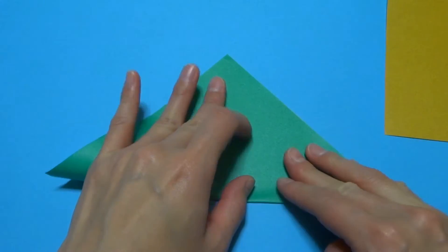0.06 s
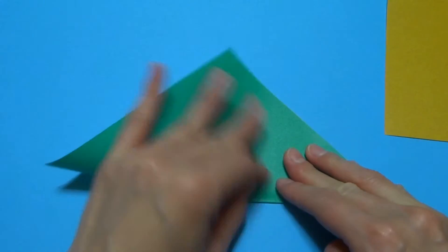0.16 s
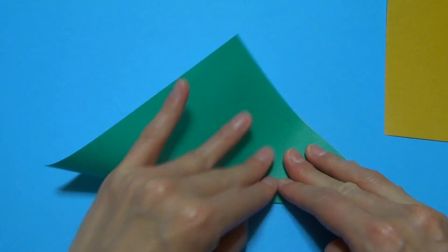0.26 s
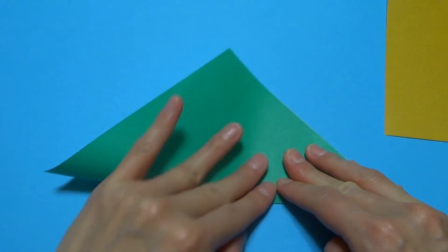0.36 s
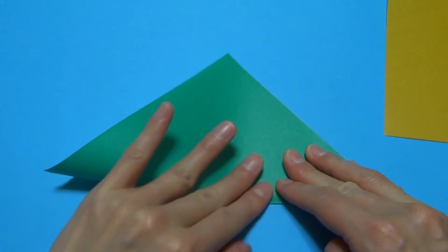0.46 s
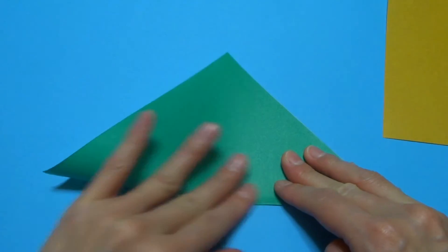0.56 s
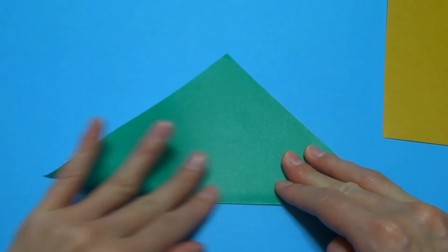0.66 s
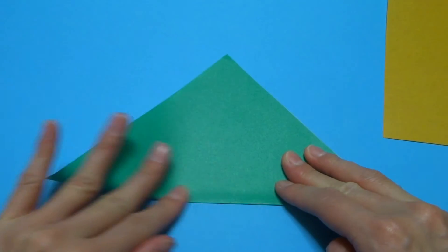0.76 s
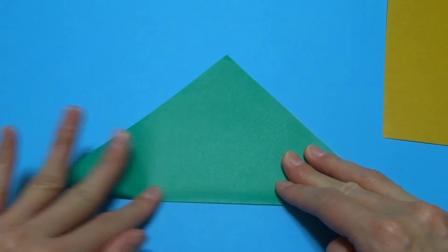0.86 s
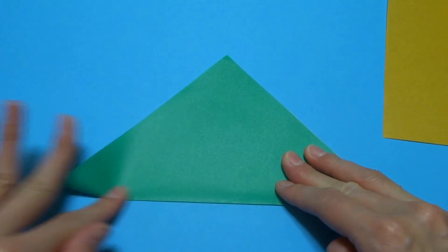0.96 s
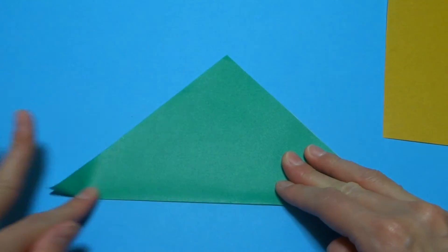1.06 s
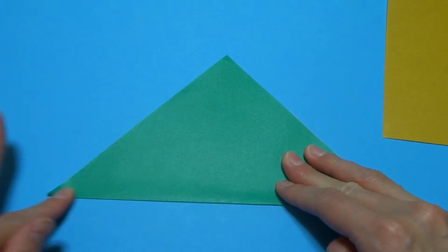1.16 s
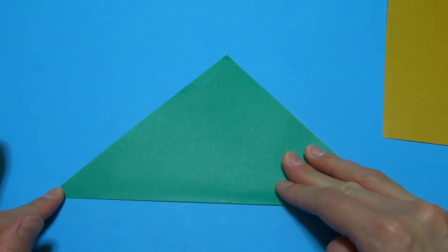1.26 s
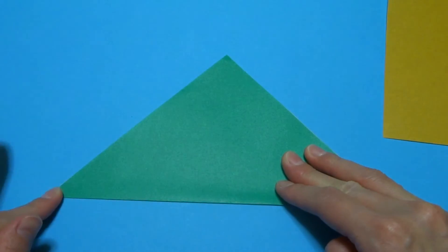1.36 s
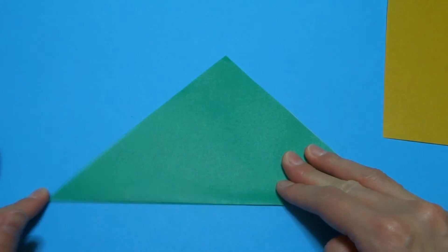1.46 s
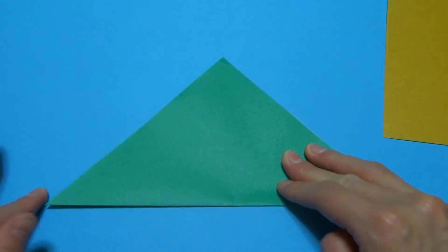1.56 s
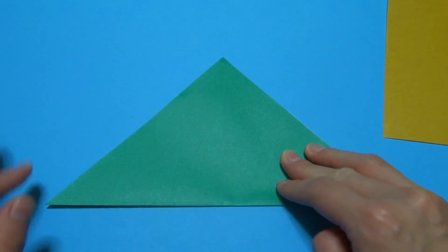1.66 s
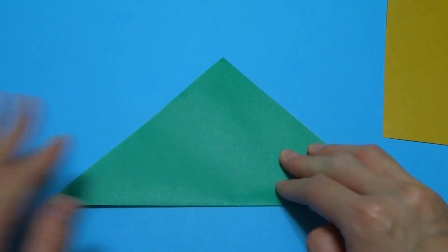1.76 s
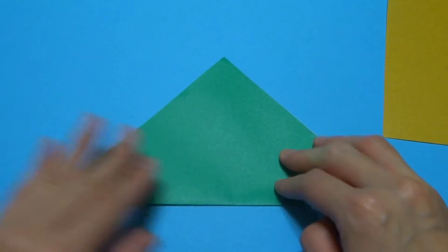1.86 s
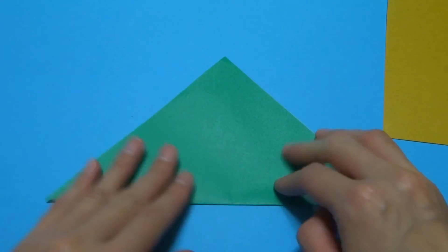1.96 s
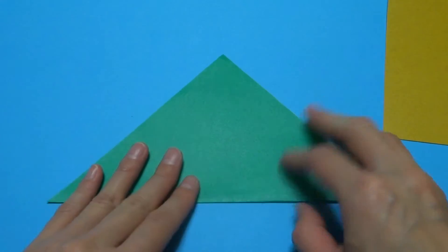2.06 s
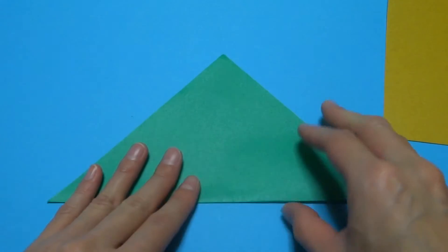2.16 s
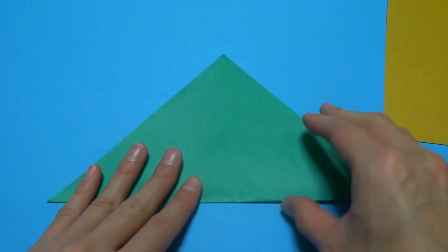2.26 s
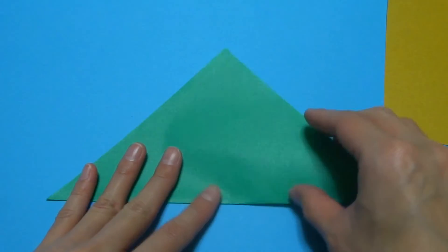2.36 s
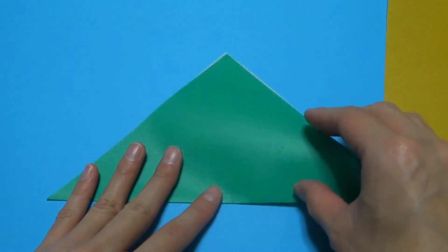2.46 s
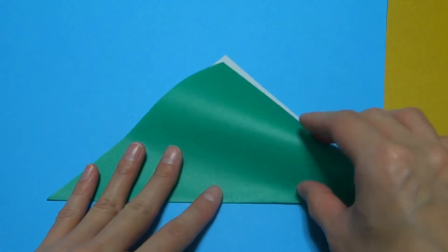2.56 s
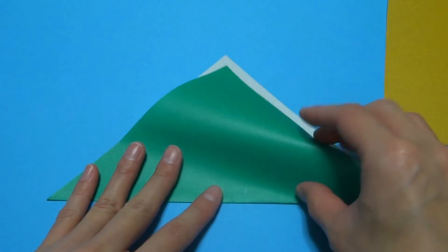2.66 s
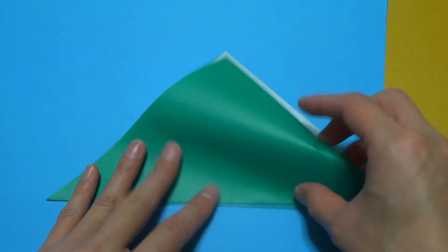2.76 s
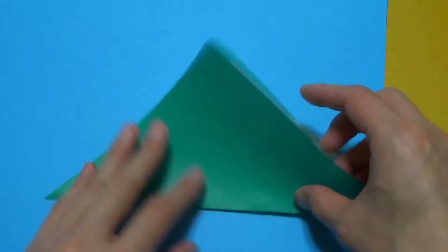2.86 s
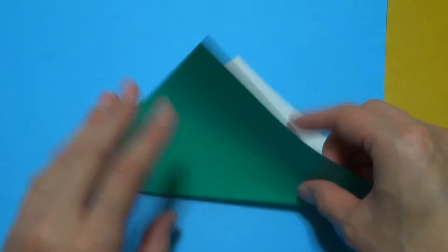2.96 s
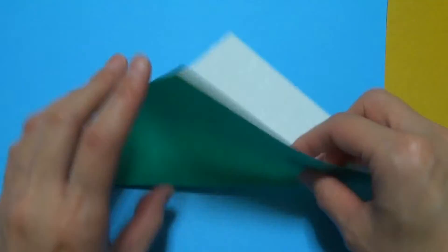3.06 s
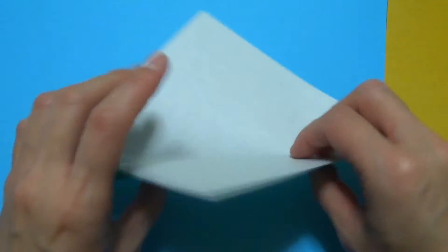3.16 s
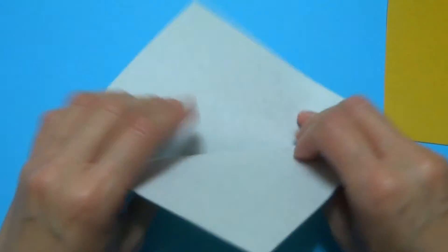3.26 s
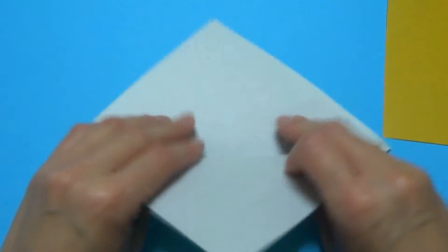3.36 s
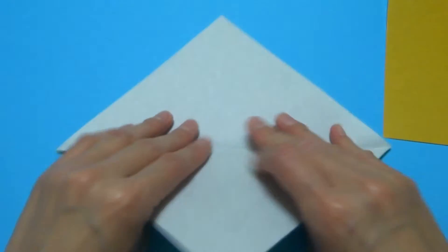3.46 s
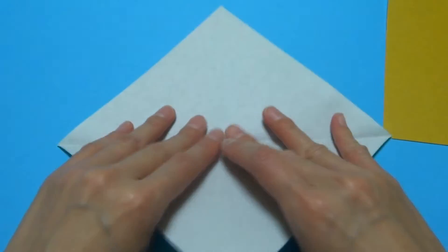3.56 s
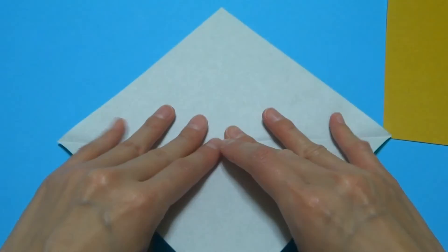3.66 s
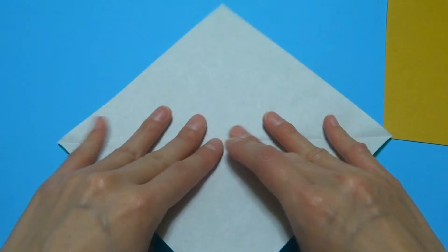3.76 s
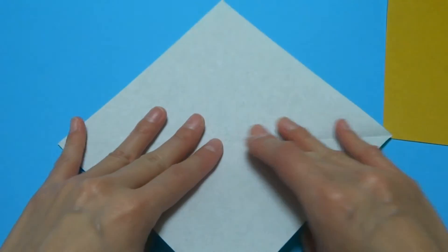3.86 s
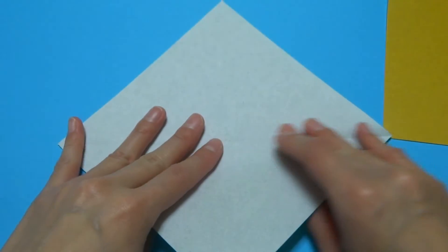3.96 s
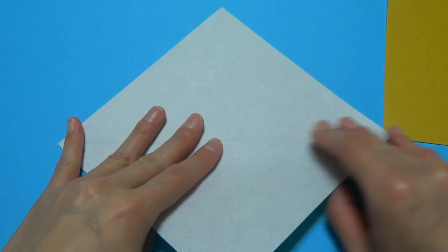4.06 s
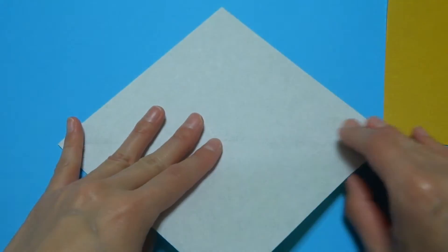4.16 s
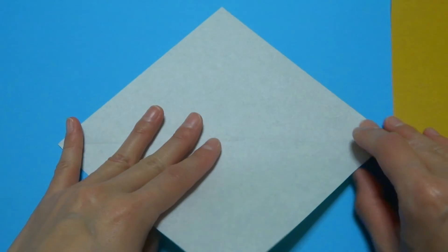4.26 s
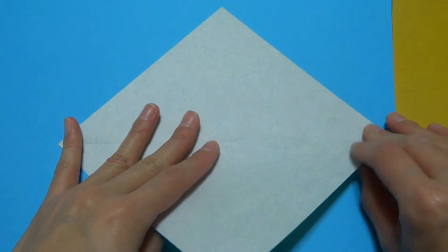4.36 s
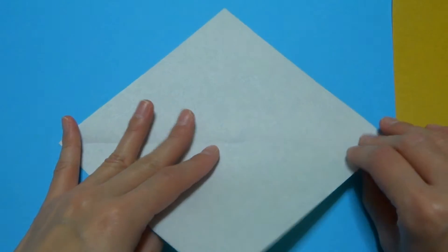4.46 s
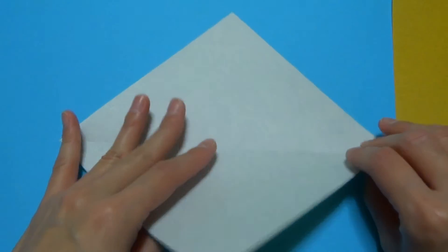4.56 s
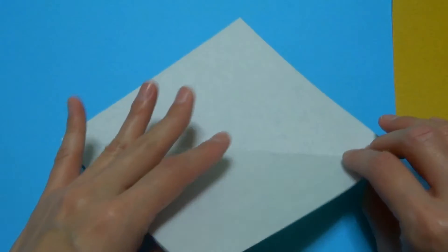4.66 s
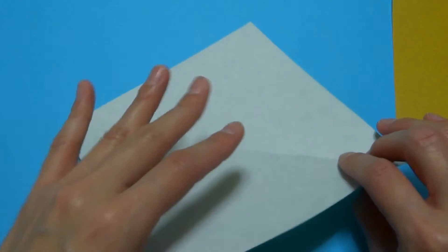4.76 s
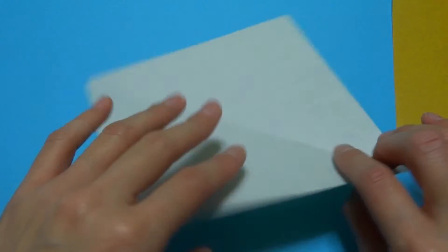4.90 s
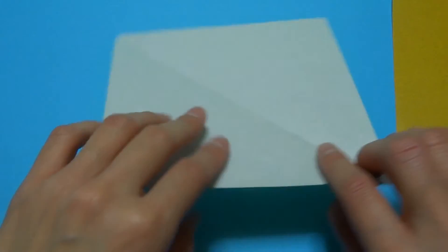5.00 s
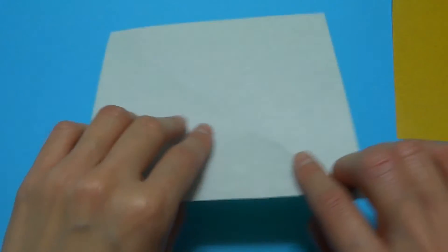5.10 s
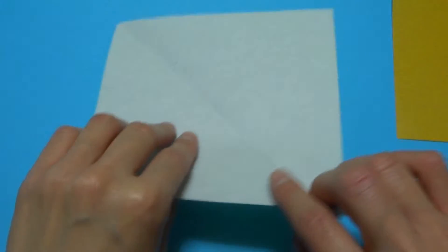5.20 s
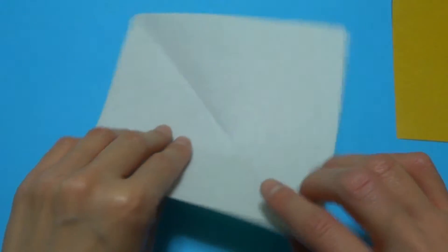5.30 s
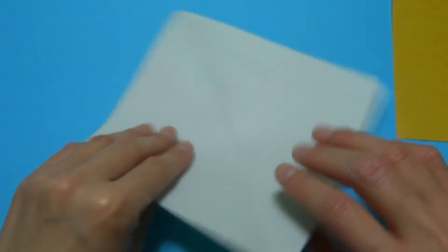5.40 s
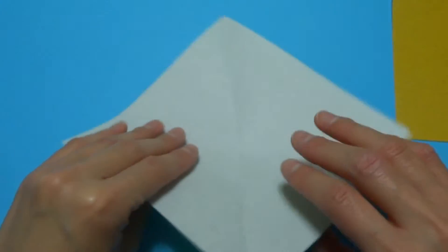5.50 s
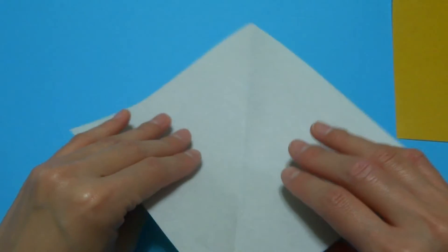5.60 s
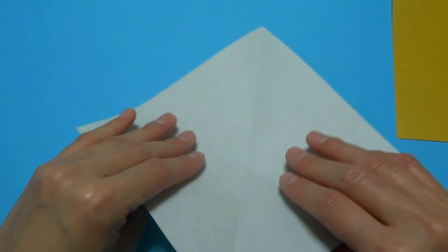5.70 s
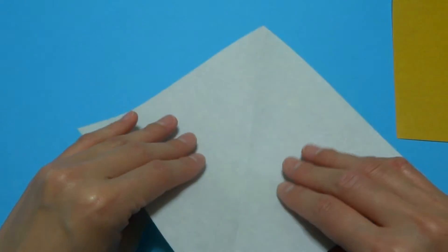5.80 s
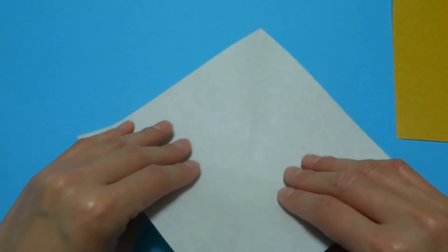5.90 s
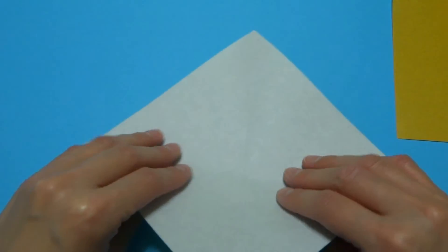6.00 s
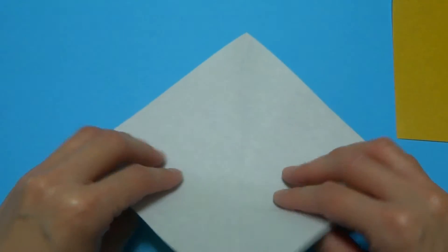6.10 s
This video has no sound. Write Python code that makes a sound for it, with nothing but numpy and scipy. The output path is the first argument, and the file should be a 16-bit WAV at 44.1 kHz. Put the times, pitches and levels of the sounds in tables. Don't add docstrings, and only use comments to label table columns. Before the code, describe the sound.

A thin sheet of paper is creased, snapped open, turned and smoothed by hand on a table, over faint fan whir and hiss.

```python
import sys
import numpy as np
from scipy import signal
from scipy.fft import rfft, irfft, next_fast_len
from scipy.io import wavfile
from scipy.ndimage import uniform_filter1d, map_coordinates

SR = 44100
rng = np.random.default_rng(int(sys.argv[2]) if len(sys.argv) > 2 else 0)


def amplitude_ratio(level_db):
    exponent = np.asarray(level_db, float) / 20
    return 10 ** exponent


def generate_wav(signal):
    frames = np.transpose(np.atleast_2d(signal))
    scaled = np.clip(frames, -1, 1) * 32767
    pcm = np.round(scaled).astype(np.int16)
    wavfile.write(sys.argv[1], SR, pcm)


N = 270774

# pitch_hz, level_db (per Hz)
HUSH_SHARED = [(15, -32), (25, 0.5), (40, -3), (60, -5), (92, -5.5), (125, -10.5), (214, -11), (298, -15),
               (365, -17), (786, -22.5), (1180, -8.5), (1310, -13.5), (1530, -9), (2020, -25), (11200, -44),
               (14600, -76), (22000, -120)]
# pitch_hz, level_db (per Hz)
HUSH_OPPOSITE = [(15, -61), (25, -31), (97, -16.5), (237, -16.5), (306, -14), (347, -21), (385, -14),
                 (484, -19), (871, -17), (1010, -2.5), (1380, -19), (1490, -8), (1740, -14), (1970, -24),
                 (11200, -51), (14600, -89), (22000, -120)]
# pitch_hz, width_hz, level_db, left_lead_rad
FAN_WHIRS = [(1194, 41, -64.5, 0.99), (1509, 55, -67.5, -0.85), (102.6, 14.3, -63, -0.088)]
# pitch_hz, time_to_fall_60_db_s
ROOM_DECAY = [(500, 0.52), (2000, 0.11), (5000, 0.17), (10000, 0.061)]
# pitch_hz, width_hz, level_db
WOOD_MODES = [(219, 90, -6.5), (417, 270, -1), (670, 240, -3.5), (920, 130, 3.5)]
# start_s, level_db, pitch_hz, time_to_fall_60_db_s, rise_s, wood_db
KNOCKS = [(.255, -48.5, 110, 0.062, 0.005, 3.5), (0.31, -38, 205, 0.06, 0.0011, -8),
          (1.375, -33.5, 112, 0.059, 0.0018, -4), (1.384, -41, 111, 0.057, 0.0018, -2),
          (1.394, -36.5, 104, 0.064, .002, -4.5), (1.403, -45.5, 105, 0.12, 0.0026, 6),
          (1.52, -46, 90, 0.12, 0.0043, -16), (2.899, -45, 133, 0.1, .005, -4),
          (3.24, -37.5, 70, 0.26, 0.039, -5.5), (3.431, -37, 59.7, 0.26, 0.018, -31),
          (3.511, -36, 69.6, .3, 0.024, -25), (3.66, -39.5, 199, 0.15, 0.0042, -8),
          (5.559, -37.5, 72, 0.36, 0.029, -30)]
ZONE_CENTRES = [1160, 3000, 5550, 9700]
# time_s, flap_db, body_db, rasp_db, sheen_db
SLIDING = [(0.0, -53, -74, -81, -70), (0.016, -66, -82, -87, -82), (0.032, -46, -57, -60, -59),
           (0.048, -72, -56, -58, -58), (0.094, -74.5, -70, -74, -71), (0.106, -57, -60, -64, -54),
           (0.142, -64, -69, -64, -65), (0.224, -54, -55, -41, -45.5), (0.356, -58.5, -54, -59, -58),
           (0.414, -53, -62, -64, -69), (0.5, -67, -67, -67, -68), (0.51, -53, -81, -64, -74.5),
           (0.522, -72, -47, -68, -62), (0.582, -48.5, -53, -43, -49), (0.7, -53.5, -48.5, -43.5, -43.5),
           (0.764, -52.5, -47.5, -54, -49), (0.902, -57, -51.5, -42, -52.5), (0.922, -72, -49, -55, -49),
           (0.932, -58, -50, -51, -49), (0.974, -64, -48, -43, -46.5), (0.988, -55, -49.5, -44.5, -49),
           (1.022, -60, -59, -48.5, -52.5), (1.116, -59, -58, -62, -53), (1.138, -69, -59, -65, -58),
           (1.3, -61, -77, -77, -80), (1.33, -70, -82, -88, -82), (1.36, -64, -76, -75, -84),
           (1.372, -56, -62, -71, -71), (1.408, -59, -70, -73, -81), (1.486, -58, -72, -64, -59.5),
           (1.564, -62, -78, -75, -73), (1.61, -56, -72, -74, -65), (1.64, -62.5, -77, -78, -78),
           (1.858, -61.5, -87, -80, -81), (1.868, -62, -90, -68, -65.5), (1.926, -60, -86, -78, -80),
           (2.046, -61, -83, -73, -58.5), (2.112, -55, -82, -75, -76), (2.298, -59, -77, -79, -75),
           (2.308, -58, -79, -76, -64), (2.53, -59, -69, -67, -69), (2.56, -50, -72, -64, -66),
           (2.642, -52.5, -55.5, -56.5, -56), (2.758, -63, -61.5, -63, -65), (2.864, -50, -59, -57, -58),
           (2.974, -39.5, -52, -41, -47), (3.052, -44, -49.5, -49.5, -59), (3.2, -53, -60.5, -50, -50),
           (3.22, -48, -49, -62, -60), (3.312, -46, -49, -53, -57.5), (3.426, -37, -46, -46.5, -51.5),
           (3.502, -33, -34, -30, -39), (3.57, -40, -45.5, -44, -49), (3.68, -45, -52, -64, -66),
           (3.74, -49, -56, -56, -56), (3.76, -56, -60, -59, -64), (3.8, -60, -55, -56, -55),
           (3.856, -61, -52, -62.5, -50), (3.862, -34, -49, -47, -56), (3.876, -54, -58, -51, -53),
           (3.954, -59.5, -54.5, -47.5, -47), (4.092, -52, -53.5, -50, -47.5),
           (4.222, -55, -54, -53.5, -59), (4.242, -54, -57.5, -47, -48.5), (4.35, -55, -54, -57, -64),
           (4.37, -57, -56.5, -57, -61), (4.43, -57, -64, -63, -59.5), (4.502, -60, -56, -44, -46.5),
           (4.544, -69, -60, -53, -53), (4.57, -67, -50, -42, -42), (4.65, -52, -50, -51, -51.5),
           (4.666, -59, -58, -57, -58), (4.732, -66, -52.5, -51, -44), (4.762, -47.5, -48.5, -52, -50),
           (4.784, -63, -55, -59, -53), (4.866, -60, -49, -40, -36.5), (4.894, -49.5, -43, -44, -35),
           (5.016, -57, -53.5, -43, -39), (5.06, -56, -57, -63, -55), (5.11, -44, -57.5, -67, -63),
           (5.168, -66, -60, -65, -43), (5.176, -50, -56, -56, -51), (5.246, -50, -49.5, -50, -43),
           (5.272, -57, -58, -59, -56), (5.29, -51, -49.5, -43.5, -34), (5.38, -54, -48.5, -39.5, -37.5),
           (5.446, -53, -43.5, -40, -31.5), (5.49, -54, -49.5, -43, -41), (5.6, -62, -48, -41.5, -37),
           (5.62, -62, -48.5, -40, -36.5), (5.658, -59, -60, -51, -51), (5.712, -47, -52, -46, -44.5),
           (5.73, -69, -62, -63, -61), (5.768, -54, -60, -50.5, -62), (5.794, -68, -69, -74, -66),
           (5.86, -66, -68, -58, -56), (5.968, -57, -60, -57, -58.5), (5.984, -48.5, -59, -47.5, -49),
           (6.03, -58, -59, -49.5, -54.5), (6.14, -48.5, -49.5, -42, -49.5)]
# start_s, peak_db, ring_hz, flap_db, sheen_db, after_crackle_db
SNAPS = [(0.0307, -36, 2830, 4, -16, -22), (0.1057, -47, 3180, -14, -8, -18),
         (0.3087, -36.5, 5610, -4, -19, -23), (0.4297, -39.5, 2060, -14, -27, -18),
         (1.3737, -41, 2900, -12, -23, -21), (1.481, -37.5, 5870, -10, -16, -16),
         (1.5962, -50, 2030, -9, -9, -18), (1.968, -51, 6290, 0, -12, -14),
         (2.0387, -44, 6280, -6, -7, -14), (2.3098, -48, 6000, -12, 0, -24),
         (2.382, -37.5, 2000, -2, -18, -16), (2.4299, -31.5, 3900, -13, -3, -26),
         (2.5586, -14.5, 5070, -14.5, -24, -20.5), (2.561, -20.5, 3240, -11, -19, -18),
         (2.6354, -35.5, 3000, -11, -7, -20), (2.7133, -43, 4020, -9, -20, -18),
         (2.7871, -32, 5200, -16, -6, -4), (2.8122, -28.5, 2680, -18, -13, -21),
         (2.8575, -10.5, 4100, -14, -11.5, -10.5), (2.8823, -7.5, 5460, -15, -33, -22.5),
         (2.886, -15, 3880, -21, -18, -6), (2.906, -16, 3260, -6.5, -20, -12),
         (2.972, -22, 5340, -12, -16, -7), (2.9852, -22, 5120, -12, -10, -25),
         (3.0068, -20, 5220, -15, -20, -24), (3.0621, -24.5, 4580, -3.5, -30, -17),
         (3.0875, -26, 3940, -13, -22, -21), (3.2311, -13.5, 3470, -12, -15, -14.5),
         (3.2876, -20, 2500, -7, -27, -18), (3.3637, -38.5, 2500, 7, 0, -18),
         (3.403, -9, 2140, -21, -38, -16), (3.4296, -26, 2360, -1, -9, -22),
         (3.4298, -10, 2120, -6.5, -23, -22), (3.5215, -22, 4430, -18, -18, -18),
         (3.5882, -11.5, 3480, -15, -14, -14), (3.6024, -17, 3290, -8, -16, -18),
         (3.6105, -23, 3420, 7, -21, -18), (3.6412, -34, 2720, 9.5, -19, -18),
         (3.652, -38, 3890, -6, -23, -20), (3.6703, -21, 3560, -1.5, -33, -16),
         (3.6917, -20.5, 3230, -1.5, -23, -17), (3.7147, -33, 2300, 9, -18, -18),
         (3.8615, -30, 3930, -19, -18, -20), (4.2336, -37, 6300, -18, -8, -18),
         (4.3194, -34.5, 4040, -16, -17, -14), (4.585, -16, 3980, -22, -2, -15),
         (4.5957, -18.5, 6000, -25, -6, -14), (4.5996, -28, 6170, -20, -11, -18),
         (4.7562, -33, 3070, -2, -21, -18), (4.8609, -24, 6600, -34, -7, -15),
         (4.8724, -31, 6300, -37, -9, -18), (4.9228, -22.5, 6500, -33, -13, -16),
         (4.9727, -29, 5900, -36, -1, -22.5), (5.0729, -23, 2520, -3, -29, -17),
         (5.0949, -34, 6500, -1, -16, -16), (5.2033, -29.5, 6200, -10, -5, -18),
         (5.4165, -24, 5670, -30, -4, -18), (5.6123, -24, 5000, -35, -9, -19),
         (5.707, -35, 4480, -19, -11, -18)]


def unit(x):
    return x / np.sqrt(np.mean(x ** 2) + 1e-20)


def peaked(x):
    return x / abs(x).max()


def along(points, hz):
    point_hz, value = np.transpose(points)
    return np.interp(np.log(hz + 1), np.log(point_hz + 1), value)


def wobble(rate):
    knots = rng.standard_normal(int(N * rate / SR) + 4)
    return map_coordinates(knots, [np.arange(N) * rate / SR])


def filtered(x, response):
    n = x.shape[-1]
    m = next_fast_len(n + 4096)
    hz = np.fft.rfftfreq(m, 1 / SR)
    return irfft(rfft(x, m) * response(hz), m)[..., :n]


def mode(f, hz, width):
    return 1j * f * width / (hz * hz - f * f + 1j * f * width + 1e-9)


def grit(n, spiky_db):
    return unit(rng.standard_normal(n) * amplitude_ratio(spiky_db * rng.exponential(size=n)))


def hush():
    shared = unit(filtered(rng.standard_normal(N), lambda f: amplitude_ratio(along(HUSH_SHARED, f))))
    opposite = unit(filtered(rng.standard_normal(N), lambda f: amplitude_ratio(along(HUSH_OPPOSITE, f))))
    level_db = -54.5 + 0.95 * wobble(3.42)
    air = amplitude_ratio(level_db) * (shared + amplitude_ratio(2) * np.array([opposite, -opposite]))
    for hz, width, db, lead in FAN_WHIRS:
        turn = np.exp(0.5j * lead * np.array([[1], [-1]]))
        whir = filtered(rng.standard_normal((1, N)), lambda f: turn * mode(f, hz, width) ** 2)
        air += amplitude_ratio(db + 1.1 * wobble(4.27)) * unit(whir)
    return air


def room(x):
    hz, t, z = signal.stft(rng.standard_normal((2, SR // 3)), SR, nperseg=256)
    fade = amplitude_ratio(-60 * t / along(ROOM_DECAY, hz)[:, None])
    tail = signal.istft(z * fade, SR, nperseg=256)[1]
    tail = tail / np.linalg.norm(tail[0])
    delayed = np.pad(x, (300, 0))[None]
    return signal.fftconvolve(delayed, tail, axes=1)[:, :N]


def wood(f):
    total = 0
    for k, (hz, width, db) in enumerate(WOOD_MODES):
        total = total + (-1) ** k * amplitude_ratio(db) * mode(f, hz, width)
    return total


def knocks():
    low, blows = np.zeros(N + SR), np.zeros(N + SR)
    t = np.arange(SR // 2) / SR
    for start, db, hz, t60, rise, wood_db in KNOCKS:
        i = round(start * SR)
        swing = (1 - np.exp(-t / rise)) * np.sin(2 * np.pi * hz * t)
        low[i:][:len(t)] += amplitude_ratio(db - 60 * t / t60) * swing
        scuff_db = db + wood_db + 16 - 60 * t / 0.032
        blows[i:][:len(t)] += amplitude_ratio(scuff_db) * rng.standard_normal(len(t))
    return low[:N] + filtered(blows[:N], wood)


def thin(f):
    return 1 / (1 + (850 / (f + 1)) ** 9) + amplitude_ratio(-10.5) * np.abs(mode(f, 260, 370))


def slide():
    rubbing = grit(N, spiky_db=2.5) * amplitude_ratio(1.02 * wobble(70) + 1.63 * wobble(22))
    hz, t, z = signal.stft(rubbing, SR, nperseg=256)
    time_s, *zone_db = np.transpose(SLIDING)
    width_hz = np.array([1200, 2300, 2700, 4000])
    density = np.array([np.interp(t, time_s, d) for d in zone_db])
    density = density - 10 * np.log10(2 * width_hz / SR)[:, None]
    place = np.interp(np.log(hz + 1), np.log(ZONE_CENTRES), np.arange(4))
    grid = np.meshgrid(place, np.arange(len(t)), indexing="ij")
    colour = map_coordinates(density, grid, order=1)
    patches = uniform_filter1d(rng.standard_normal(z.shape), 4, 0)
    patches = uniform_filter1d(patches, 24, 1)
    return signal.istft(z * amplitude_ratio(colour + 2.12 * unit(patches)), SR, nperseg=256)[1][:N]


def flap(f):
    return mode(f, 1094, 560) * mode(f, 1440, 1160)


def sheen(f):
    return mode(f, 6820, 3700) ** 2


def snaps():
    out = np.zeros(N + SR)
    t = np.arange(SR // 8) / SR
    for start, db, hz, flap_db, sheen_db, crackle_db in SNAPS:
        burst = rng.standard_normal(len(t)) * (t / 0.0007) ** 2 * np.exp(-2 * t / 0.00086)
        crack = peaked(filtered(burst, lambda f: mode(f, hz, 0.45 * hz) + amplitude_ratio(-22) * mode(f, 3300, 11000)))
        crack += amplitude_ratio(flap_db) * peaked(filtered(burst, flap))
        crack += amplitude_ratio(sheen_db) * peaked(filtered(burst, sheen))
        settle = grit(len(t), spiky_db=-0.5) * (1 - np.exp(-(t / 0.0038) ** 2)) * amplitude_ratio(-60 * t / 0.17)
        settle = filtered(settle, lambda f: mode(f, hz, 1.14 * hz) + amplitude_ratio(flap_db + 4) * flap(f)
                          + amplitude_ratio(sheen_db - 19) * sheen(f))
        i = round(start * SR) - 12
        out[i:][:len(t)] += amplitude_ratio(db + 3) * (crack + amplitude_ratio(crackle_db) * settle)
    return out[:N]


def scene():
    sheet = filtered(slide() + snaps(), thin)
    table = knocks()
    direct = amplitude_ratio(-1.57) * sheet + table
    echoes = amplitude_ratio(-14) * room(sheet) + amplitude_ratio(-12.5) * room(table)
    return direct + echoes + hush()


def band_limit(x):
    return signal.sosfilt(signal.butter(12, 12360, fs=SR, output="sos"), x)


def record(dry):
    def edge(hz):
        return 1 / (1 + (hz / 11130) ** 220) + amplitude_ratio(-42) / (1 + (hz / 11600) ** 40)
    mix = filtered(dry, edge)
    return band_limit(mix)


dry = scene()
out = record(dry)
generate_wav(out)
```